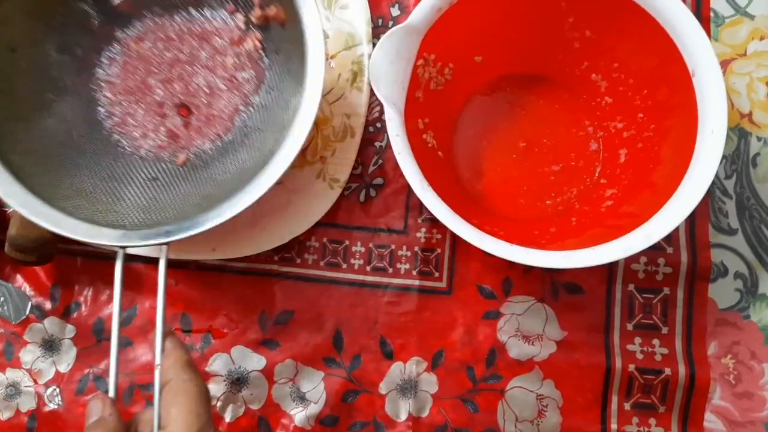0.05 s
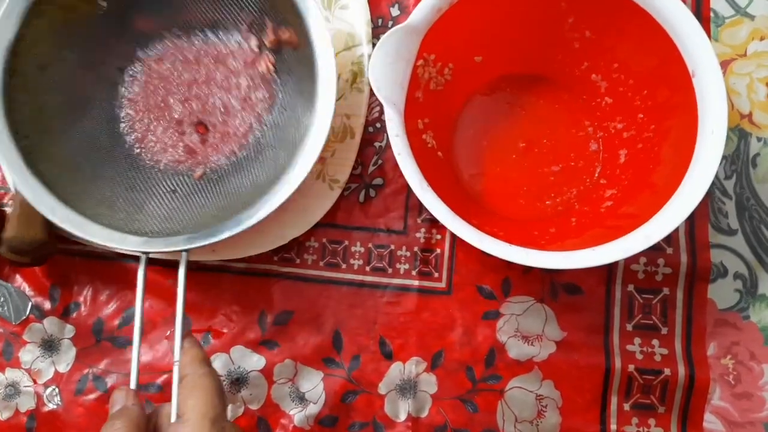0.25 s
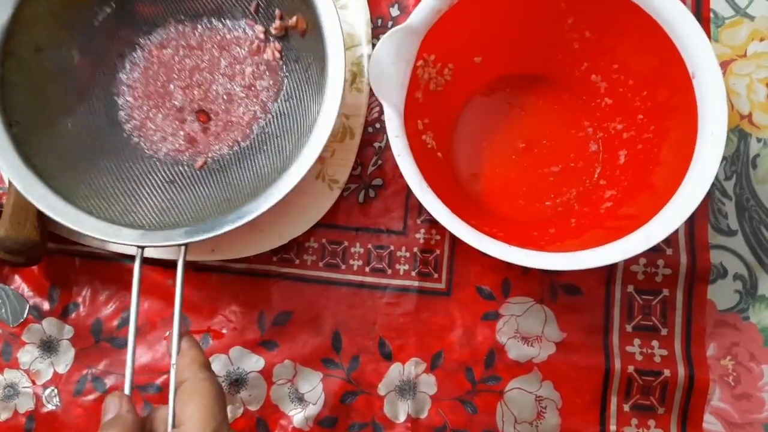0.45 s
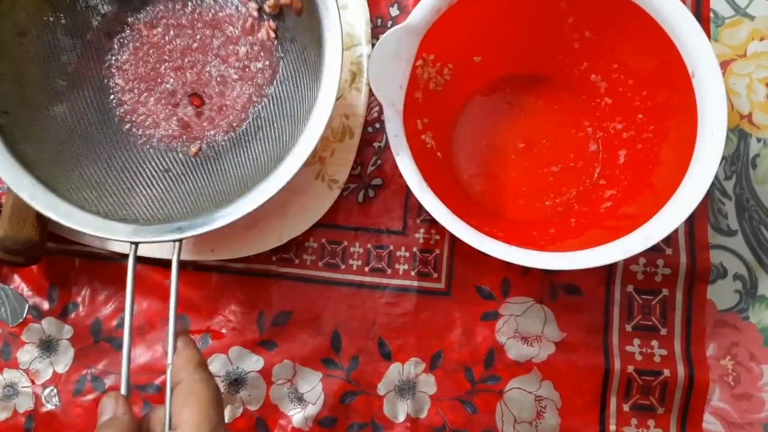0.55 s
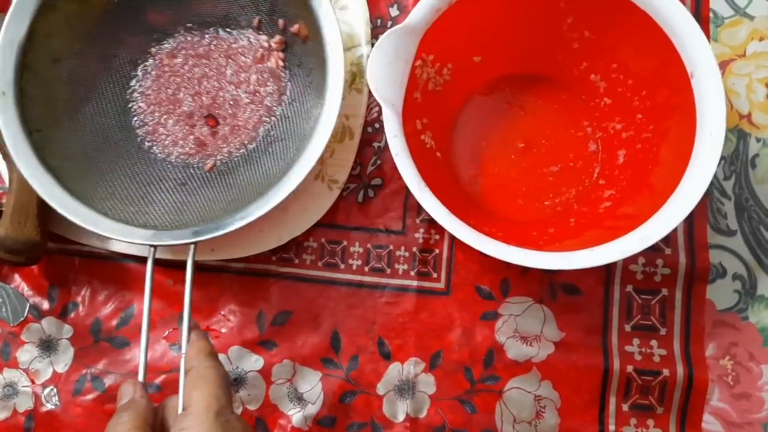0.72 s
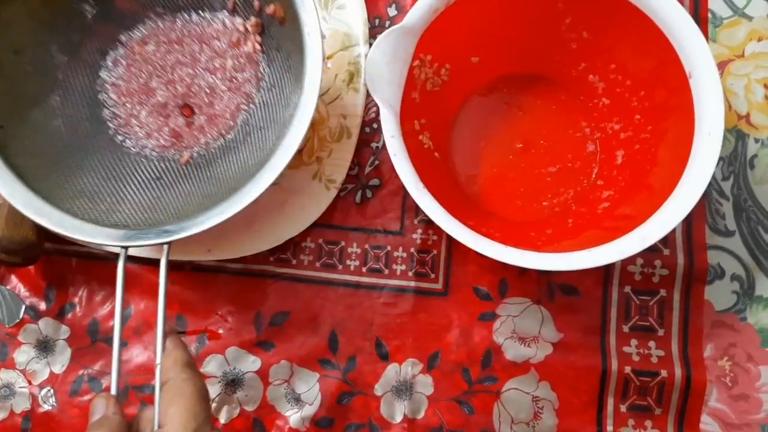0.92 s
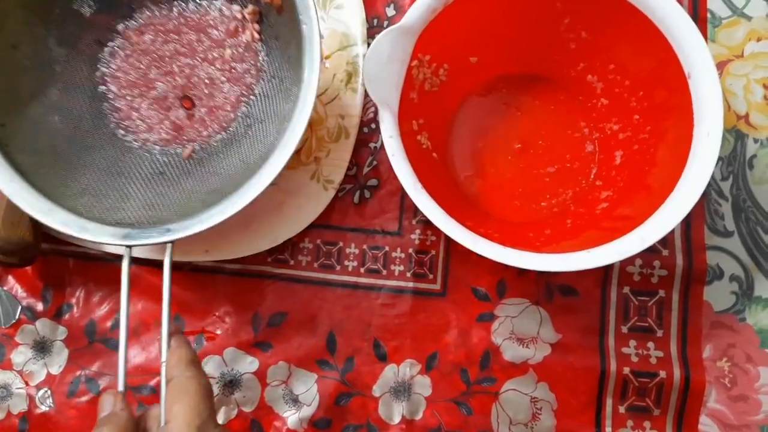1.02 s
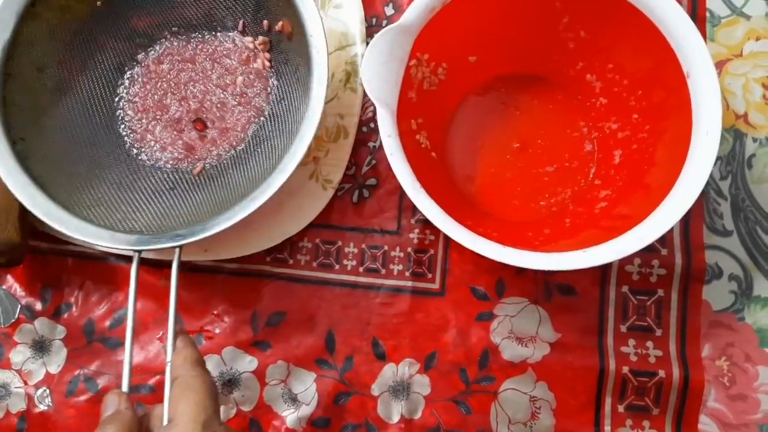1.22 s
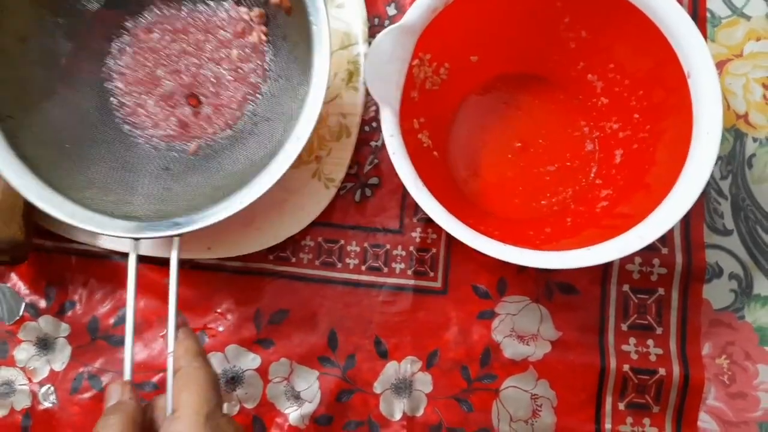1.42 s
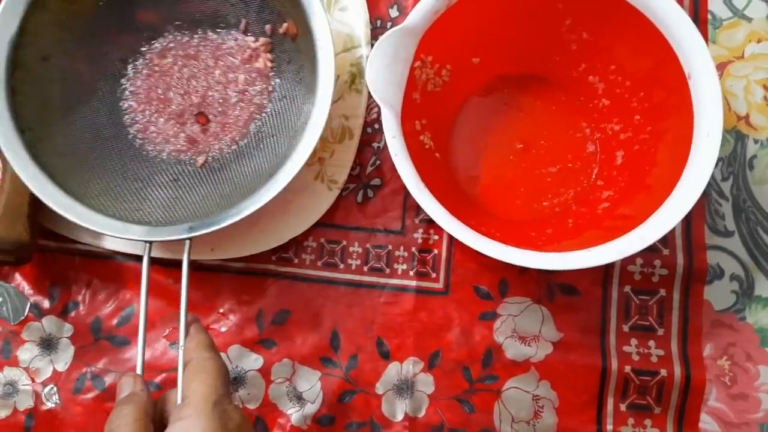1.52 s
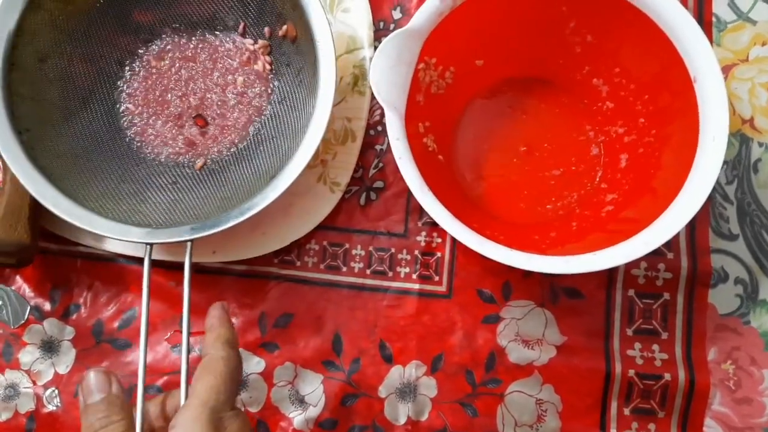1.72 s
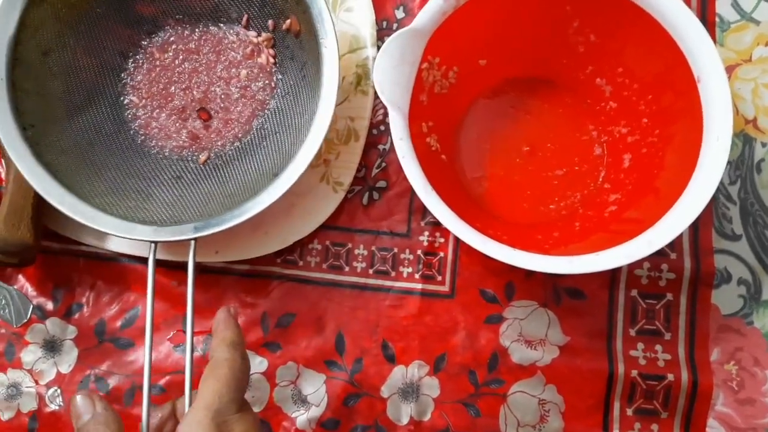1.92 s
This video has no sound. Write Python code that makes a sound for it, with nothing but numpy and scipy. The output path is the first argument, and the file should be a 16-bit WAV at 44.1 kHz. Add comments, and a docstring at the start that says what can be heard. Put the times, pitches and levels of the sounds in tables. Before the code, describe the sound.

Four short, evenly spaced knocks of a metal strainer on a bowl in a small kitchen.

```python
"""A wire strainer full of pulp is knocked four times against a bowl in a small kitchen.
Each tap is a brief scrape, then a cluster of contacts: the bowl knocks low, the steel rim
clacks and ticks on the bowl's edge, and the shaken mesh crackles. The kitchen answers with a
short echo. Soft handling thumps and low room noise lie underneath, all picked up by a dull
microphone on the left and a bright one on the right."""
import sys
import numpy as np
from scipy import signal
from scipy.fft import rfft, irfft, next_fast_len
from scipy.io import wavfile
from scipy.ndimage import uniform_filter1d, minimum_filter1d

SR = 44100
rng = np.random.default_rng(int(sys.argv[2]) if len(sys.argv) > 2 else 0)


def inscribe(sig):
    """Save sig as 16-bit PCM at rate SR to the path in sys.argv[1].

    A 1-D sig is mono; a 2-D sig holds one channel per row.
    Samples are clipped to [-1, 1] before scaling.
    """
    pcm = np.round(np.clip(np.atleast_2d(sig).T, -1, 1) * 32767)
    wavfile.write(sys.argv[1], SR, pcm.astype(np.int16))


N = 85995

# The hits that make up the four taps. Each row: start in seconds, bowl level in dB, rim and tick
# level in dB, mesh level in dB, length of the push in seconds, pitch the contact favours in Hz.
TAP_CONTACTS = [(0.3852, -22, -34, -19.5, 0.00034, 1660), (0.392, -37, -10, -6.5, 0.00037, 1660),
                (0.3992, 3, -11.5, -9, 0.00053, 649), (0.4144, -9, -28.5, -11, 0.0012, 535),
                (0.4179, 5, -31, -32, 0.0028, 535), (0.4355, -5.5, -44, -24, 0.0017, 535),
                (0.8268, -4, -27, -7.5, 0.00017, 910), (0.8275, -31, -1.5, -3.5, .0002, 1660),
                (0.8293, -6, -12.5, -5.5, 0.00075, 670), (0.841, -2, -30, -23.5, 0.0044, 352),
                (1.2263, -10, -23, -25, 0.00068, 770), (1.2320, -9, -9, -7.5, 0.00033, 1140),
                (1.2363, -17, -24, -11, 0.00046, 2820), (1.2408, 1, -18, -28, 0.0017, 313),
                (1.6262, -8, -19, -6.5, 0.00018, 860), (1.6276, -9, -3, -4, .0002, 2570),
                (1.6330, -13, -36, -34, 0.003, 290), (1.6404, -27, -24, -19, 0.00048, 2780)]
TICK_T60_S, MESH_T60_S = 0.0049, 0.012
RATTLE_DB, RATTLE_T60_S = -24.5, 0.2

def taps(t):
    """Each contact ticks, rings bowl and rim, and shakes the mesh, which rattles on briefly."""
    bowl, rim, shake, snap = 0, 0, 0, 0
    for start, bowl_db, rim_db, mesh_db, push_s, favoured_hz in TAP_CONTACTS:
        age = t - start
        bowl += undb(bowl_db) * bowl_knock(age, favoured_hz, push_s)
        rim += undb(rim_db) * rim_clack(age, favoured_hz)
        snap += undb(rim_db) * fade(age, TICK_T60_S)
        rattle = undb(RATTLE_DB) * fade(age, RATTLE_T60_S)
        shake += undb(mesh_db) * (fade(age, MESH_T60_S) + rattle)
    return bowl, rim, mesh_crackle(shake), edge_tick(snap)

# The bowl's low modes. Each row: pitch in Hz, level in dB, 60 dB decay time in seconds.
BOWL_MODES = [(288.4, -19.5, 0.085), (341.4, -21, 0.096), (535, -29.5, 0.24), (684, -17, 0.042),
              (772, -15, 0.025), (911, -13.5, 0.028), (996, -17.5, 0.061), (1237, -29, 0.011)]

def bowl_knock(age, favoured_hz, push_s):
    """The body of the hit: the bowl rings in opposite polarity to the rim."""
    return -ring(age, BOWL_MODES, favoured_hz, push_s)

# The rim's bright modes. Each row: pitch in Hz, level in dB, 60 dB decay time in seconds.
RIM_MODES = [(1452, -7.5, 0.019), (1660, -10.5, 0.016), (2200, -21, 0.007), (2576, -9.5, 0.013),
             (2670, -16, 0.0083), (2960, -16.5, 0.014), (3390, -23, 0.015), (4170, -18, 0.0047),
             (5180, -6.5, 0.016), (5430, -19, 0.0045), (6200, -2, 0.0065)]

def rim_clack(age, favoured_hz):
    """The steel rim rings, choked at once by hand and pulp."""
    return ring(age, RIM_MODES, favoured_hz)

FAVOUR_DB, FAVOUR_OCTAVES = 7.5, 0.12
MODE_SCATTER, CONTACT_RISE_S = 0.01, 0.00057

def ring(t, modes, favoured_hz, push_s=0):
    """A struck body: the point of contact lifts nearby pitches; a longer push dulls the high ones."""
    live = (t >= 0) & (t < .5)
    out, age = np.zeros(N), t[live]
    for (hz, db, t60), chance in zip(modes, rng.standard_normal(len(modes))):
        lift_db = FAVOUR_DB * np.exp(-(np.log2(hz / favoured_hz) / FAVOUR_OCTAVES) ** 2)
        gain = undb(db + lift_db) / (1 + (hz * push_s) ** 2)
        detuned_hz = hz * (1 + MODE_SCATTER * chance)
        out[live] += gain * fade(age, t60) * np.sin(2 * np.pi * detuned_hz * age)
    attack = 1 - np.exp(-np.maximum(t, 0) / CONTACT_RISE_S)
    return out * attack

# The mid-forward tone of the mesh. Each row: frequency in Hz, relative level in dB.
MESH_EQ = [(200, -7), (600, -1), (1400, 5), (2000, -7), (2700, 0.5), (4100, -3.5), (5400, -2), (9000, -11),
           (15000, -10.5)]

def mesh_crackle(shake, level_db=-5.5):
    """Shaken wires give a gritty noise that follows the shake."""
    return undb(level_db) * shake * unit(colour(grit(grain_db=1.5), MESH_EQ))

# The crisp top of the tick. Each row: frequency in Hz, relative level in dB.
TICK_EQ = [(2000, -23.5), (5000, 2.5), (8000, -4.5), (15000, -5)]

def edge_tick(snap, level_db=-1):
    """Steel meets the bowl's edge with a snap of bright noise."""
    return undb(level_db) * snap * unit(colour(rng.standard_normal(N), TICK_EQ))

# The scrape leading into each tap. Each row: start in seconds, hold in seconds, level in dB.
SCRAPE_CUES = [(0.3756, 0.029, -24), (0.816, 0.008, -26), (1.222, 0.017, -22), (1.617, 0.012, -29.5)]
# Its raspy tone. Each row: frequency in Hz, relative level in dB.
SCRAPE_EQ = [(200, 3.5), (700, 8), (1500, 4), (3000, 0), (5500, 5.5), (15000, -4)]

def scrapes(t, release_t60_s=.012):
    """Just before the rim lands, wires catch on the bowl's edge in a dense run of tiny clicks."""
    clicks = unit(colour(grit(grain_db=4), SCRAPE_EQ))
    envelope = 0
    for start, hold, db in SCRAPE_CUES:
        release = fade(np.maximum(t - start - hold, 0), release_t60_s)
        envelope += undb(db) * (t >= start) * release
    return clicks * envelope

# Low handling bumps. Each row: peak time in seconds, pitch in Hz, width in seconds,
# left level in dB, right level in dB.
THUMP_CUES = [(0.229, 58, 0.079, -46, -21.5), (0.296, 93, 0.028, -27, -19.5), (0.356, 55, 0.16, -37, -22),
              (0.408, 85.3, 0.012, -5.5, -17), (0.424, 79, 0.032, -30, -10.5), (0.602, 67, 0.018, -32, -11),
              (0.701, 65.3, 0.078, -46, -22), (0.798, 70, 0.012, -37, -11),
              (0.836, 153.3, 0.041, -23.5, -27.5), (1.209, 63, 0.021, -33, -9.5),
              (1.408, 107.4, 0.017, -11.5, -53), (1.437, 55.4, 0.13, -13.5, -50),
              (1.521, 140, 0.0064, -16, -43), (1.802, 79, 0.028, -49, -20.5)]

def handling_thumps(t):
    """Soft pushes swell and die away, unequal at the two microphones."""
    out = 0
    for peak, hz, width, left_db, right_db in THUMP_CUES:
        age = t - peak
        swell = np.exp(-2 * np.sqrt(2) * np.abs(age) / width)
        out += undb([[left_db], [right_db]]) * swell * np.cos(2 * np.pi * hz * age)
    return out

# Slaps off the nearest walls. Each row: delay in seconds, level in dB.
WALL_SLAPS = [(0.014, -15), (.033, -19)]
WALL_SPREAD_S, EARLY_DB, EARLY_T60_S = 0.0013, -22, 0.15

def early_reflections(x, t):
    """The table and walls throw the sound back in quick, scattered bursts."""
    bursts = [(fade(t, EARLY_T60_S), EARLY_DB)]
    bursts += [(np.exp(-((t - delay) / WALL_SPREAD_S) ** 2), db) for delay, db in WALL_SLAPS]
    response = diffuse() * sum(undb(db) * shape / np.linalg.norm(shape) for shape, db in bursts)
    return signal.fftconvolve(x[None], response, axes=1)[:, :N]

# The kitchen's reverb. Each row: band centre in Hz, level in dB, 60 dB decay time in seconds.
TAIL_BANDS = [(60, -10, .12), (140, 2.5, 0.21), (206, -15.5, 0.65), (320, -9.5, 0.19), (580, -5.5, 0.27),
              (1210, -9.5, 0.36), (2030, -3, 0.35), (3170, -4.5, 0.31), (4300, -10.5, 0.39),
              (5700, -2, 0.36), (14000, -8, 0.43)]
PREDELAY_S, BUILD_S = 0.0077, 0.0026

def kitchen_tail(x, t):
    """A fully scattered tail: each band stores the sound's energy and loses it at its own rate."""
    noise_spectrum = rfft(diffuse())
    age = np.maximum(t - PREDELAY_S, 0)
    tail = 0
    for k, (_, db, t60) in enumerate(TAIL_BANDS):
        band = curve([(row[0], j == k) for j, row in enumerate(TAIL_BANDS)], N)
        power = irfft(rfft(x) * band, N) ** 2
        decay = (fade(age, t60) * (1 - np.exp(-age / BUILD_S))) ** 2
        energy = signal.fftconvolve(power, decay / decay.sum())[:N]
        tail += undb(db) * np.sqrt(np.abs(energy)) * unit(irfft(noise_spectrum * band, N))
    return tail

# The tone of the echo that opens the scene. Each row: frequency in Hz, relative level in dB.
OPENING_EQ = [(300, 0.5), (1000, -5), (2700, -4), (4300, -8.5), (6000, -7), (14000, -8)]

def opening_echo(t, level_db=-30.5, t60=0.45):
    """The room is still fading from an earlier tap."""
    return undb(level_db) * fade(t, t60) * unit(colour(diffuse(), OPENING_EQ))

# The bass-heavy noise bed. Each row: frequency in Hz, relative level in dB.
ROOM_TONE_EQ = [(25, -26), (45, 0), (75, 2), (120, 1.5), (175, -1.5), (235, -9), (305, 0), (360, -3),
                (430, -10.5), (680, -9.5), (1000, -13), (1500, -10), (2600, -20), (4300, -27.5),
                (6000, -20.5), (14000, -34.5)]

def room_tone(t, level_db=-33.5, waver_db=.5, waver_hz=9):
    """A low, gently wavering background."""
    waver = np.interp(t * waver_hz, np.arange(N), rng.standard_normal(N))
    noise = irfft(rfft(diffuse()) * undb(curve(ROOM_TONE_EQ, N)), N)
    return unit(noise) * undb(level_db + waver_db * waver)

# The room's stereo image. Each row: frequency in Hz, likeness of left and right from 0 to 1.
STEREO_LIKENESS = [(50, 0.66), (130, .7), (300, 0.85), (640, 0.42), (1400, 0.01), (3000, 0)]

def diffuse():
    """White noise from all around: alike on both sides in the bass, unrelated in the treble."""
    likeness = np.clip(curve(STEREO_LIKENESS, N), 0, 1)
    mid, side = rfft(rng.standard_normal((2, N)))
    mid *= np.sqrt((1 + likeness) / 2)
    side *= np.sqrt((1 - likeness) / 2)
    return irfft(np.array([mid + side, mid - side]), N)

def grit(grain_db):
    """White noise roughened by random spikes."""
    return rng.standard_normal(N) * undb(grain_db * rng.exponential(size=N))

def undb(db):
    """Decibels to gain."""
    return 10 ** (np.asarray(db) / 20)

def unit(x):
    """Scale to rms 1."""
    return x / np.sqrt(np.mean(x ** 2))

def fade(t, t60):
    """Exponential decay from t = 0, down 60 dB after t60 seconds."""
    return (t >= 0) * np.exp(-np.log(1000) * np.maximum(t, 0) / max(t60, 1e-4))

def curve(table, size):
    """Spread (Hz, value) points over the bins of a spectrum, on a log frequency scale."""
    hz, values = np.array(table, float).T
    return np.interp(np.log(np.fft.rfftfreq(size, 1 / SR) + 1), np.log(hz), values)

def colour(x, table):
    """Minimum-phase EQ through (Hz, dB) points."""
    size = 2 * next_fast_len(N)
    cepstrum = irfft(np.log(undb(curve(table, size))))
    cepstrum[1:size // 2] *= 2
    cepstrum[size // 2 + 1:] = 0
    return irfft(rfft(x, size) * np.exp(rfft(cepstrum)))[..., :N]

BOWL_SEND_DB, RIM_SEND_DB, MESH_SEND_DB = -1.5, -6, 2

def scene():
    """The strainer up front, its echo behind it, handling and room tone underneath."""
    t = np.arange(N) / SR
    bowl, rim, mesh, tick = taps(t)
    scrape = scrapes(t)
    strainer = bowl + rim + mesh + tick + scrape
    send = scrape + undb(BOWL_SEND_DB) * bowl + undb(RIM_SEND_DB) * rim + undb(MESH_SEND_DB) * mesh
    echo = kitchen_tail(send, t) + early_reflections(send, t)
    return strainer + echo + opening_echo(t) + handling_thumps(t) + room_tone(t)

# The dull left microphone. Each row: frequency in Hz, gain in dB.
DULL_MIC_EQ = [(60, -9), (200, 2.5), (400, -0.5), (700, 5.5), (1300, -4.5), (2000, -10.5), (2700, -12),
               (4000, -16.5), (5500, -31), (7200, -29.5), (8800, -46.5), (10800, -25), (14000, -17)]
# The bright right microphone. Each row: frequency in Hz, gain in dB.
BRIGHT_MIC_EQ = [(60, -2), (210, 2), (330, 1.5), (700, 2), (1300, 2), (1650, 0.5), (2100, 1.5), (2700, 4.5),
                 (4300, -1), (6000, -2.5), (7000, -11.5), (7900, -20), (8900, -48.5), (11000, -53.5),
                 (14000, -41.5)]
RUMBLE_CUT_HZ, TOP_CUT_HZ = 43, 14500
CEILING, LIMITER_WINDOW_S = .92, .003

def record(dry):
    """Two microphones feed a rumble filter, a fast peak limiter and a steep top cut."""
    heard = np.array([colour(dry[0], DULL_MIC_EQ), colour(dry[1], BRIGHT_MIC_EQ)])
    heard = signal.sosfilt(signal.butter(2, RUMBLE_CUT_HZ, "high", fs=SR, output="sos"), heard)
    window = int(LIMITER_WINDOW_S * SR)
    peak = np.abs(heard).max(axis=0)
    gain = minimum_filter1d(CEILING / np.maximum(peak, CEILING), 2 * window)
    heard *= uniform_filter1d(uniform_filter1d(gain, window), window)
    return signal.sosfilt(signal.ellip(8, .2, 70, TOP_CUT_HZ, fs=SR, output="sos"), heard)

dry = scene()
out = record(dry)
inscribe(out)
```